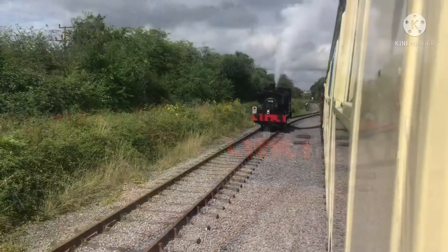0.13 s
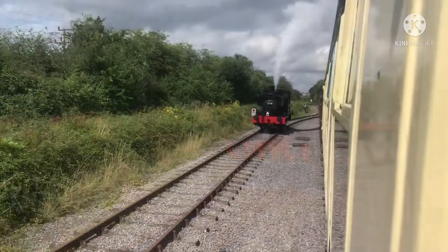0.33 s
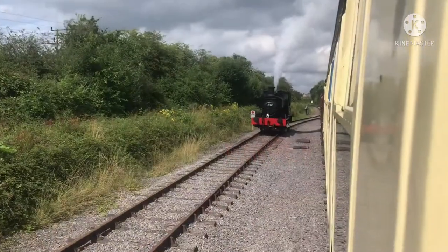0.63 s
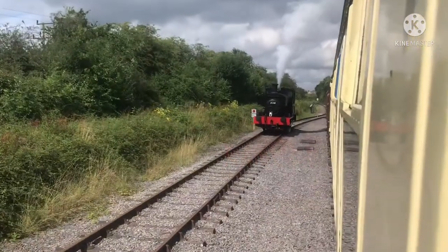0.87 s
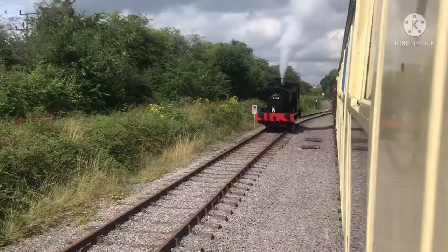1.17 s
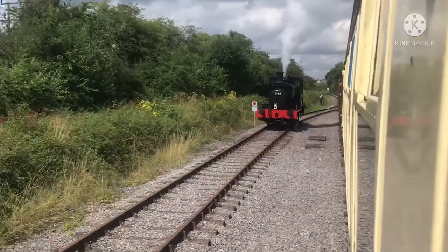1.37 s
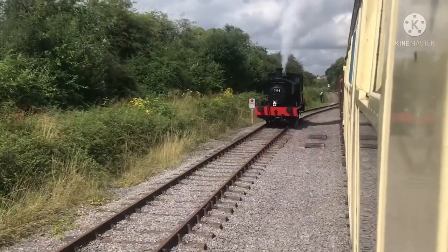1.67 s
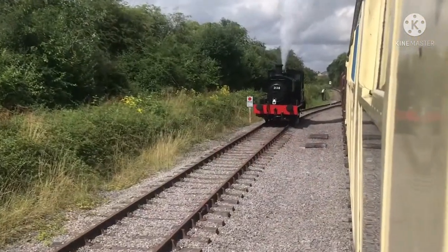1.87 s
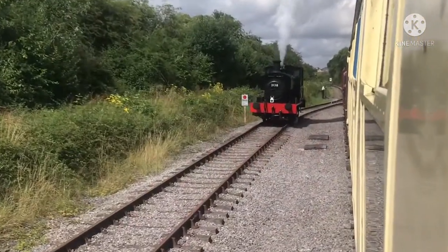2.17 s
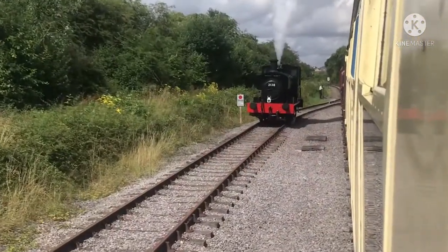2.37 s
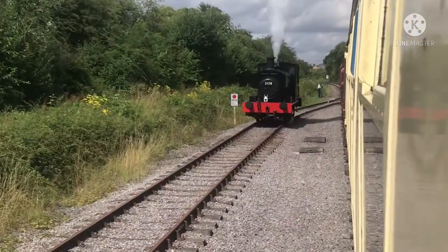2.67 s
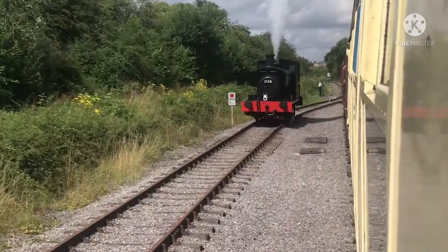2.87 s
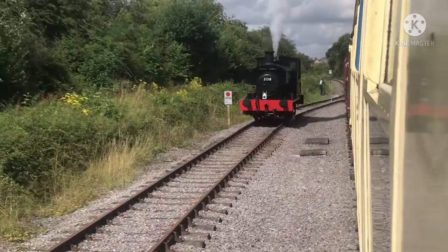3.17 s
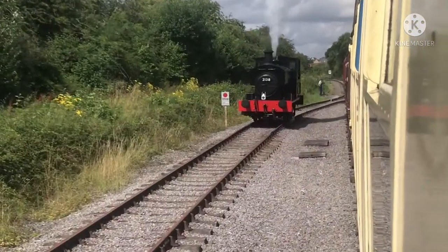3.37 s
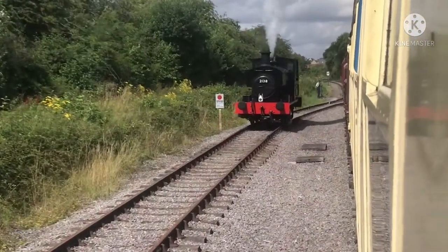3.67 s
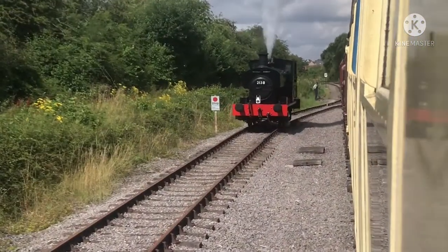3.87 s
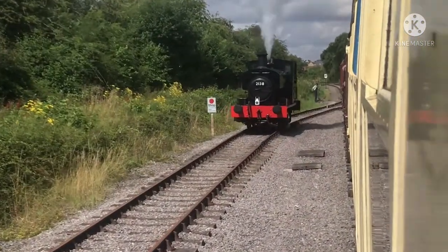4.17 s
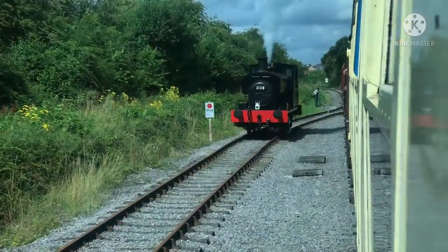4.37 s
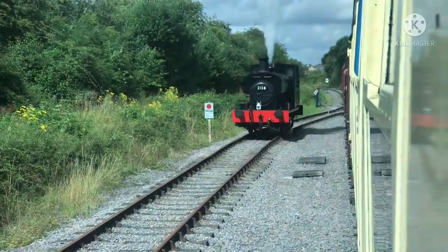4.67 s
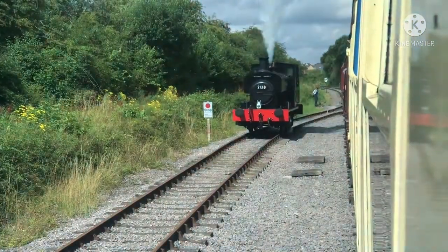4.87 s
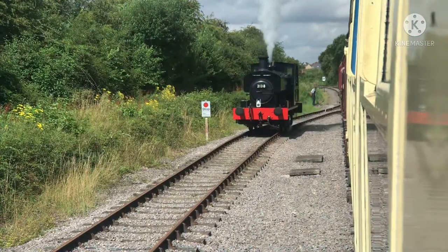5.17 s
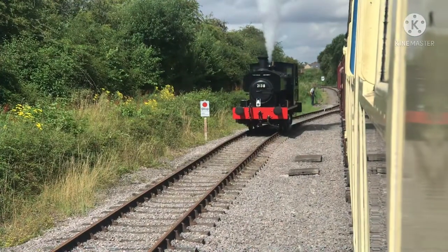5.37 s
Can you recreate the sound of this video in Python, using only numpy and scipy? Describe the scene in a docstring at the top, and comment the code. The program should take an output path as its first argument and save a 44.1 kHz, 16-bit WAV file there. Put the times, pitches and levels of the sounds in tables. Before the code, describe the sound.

Steam blows off from a small locomotive throughout, heard outdoors from a slowly rolling carriage window. The sound is already running at 0 s: a bright, sizzling high hiss with a broad airy body and a quieter dull roar that fills in over the first second. Fine, rapid sputter roughens it. Short surges swell quickly and fade more slowly, at about 1.7 s, a longer one from 2.6 to 3.4 s, and the strongest just after 3.9 s. Then the sizzle falls away, thinnest near 4.8 s, recovering slightly by the end at 5.5 s. Far beneath are a very faint deep carriage rumble and a wheel murmur that grows slightly. Soft dull knocks come around 0.9 to 1.1 s, a thud at 4.0 s and a short hollow panel tap at 4.7 s, mostly masked. The pickup is close to mono, with a slight boxy reflection from the carriage side.

```python
"""At a carriage window, rolling slowly towards a small steam locomotive that blows off steam.
The jet is patchy filtered noise: a dull roar, a broad hiss and a bright sizzle that swells in surges.
Reflections off the carriage side colour it. Underneath, low noise rumbles and murmurs for the carriage,
and soft knocks are noise thuds with ringing panel tones.
One microphone feeds both channels, the left a little late."""
import sys
import numpy as np
from scipy import signal
from scipy.fft import rfft, irfft, next_fast_len
from scipy.io import wavfile
from scipy.ndimage import uniform_filter1d, map_coordinates

SR = 44100
rng = np.random.default_rng(int(sys.argv[2]) if len(sys.argv) > 2 else 0)


def master_out(mix):
    """Clip the mix to full scale and print it as 16-bit PCM to the path in sys.argv[1]."""
    frames = np.transpose(np.atleast_2d(mix))
    ceiling = np.clip(frames, -1, 1)
    pcm = np.round(ceiling * 32767).astype(np.int16)
    wavfile.write(sys.argv[1], SR, pcm)


N = 242991  # length in samples, about 5.5 s


def amp(db):
    """Turn decibels into an amplitude gain."""
    return 10 ** (np.asarray(db) / 20)


def unit(x):
    """Scale to rms 1."""
    return x / np.sqrt(np.mean(x ** 2) + 1e-20)


def along(points, hz):
    """Read (frequency_hz, value) points, interpolated on a log frequency axis."""
    point_hz, values = np.transpose(points)
    return np.interp(np.log(hz + 1), np.log(point_hz + 1), values)


def curves(rows):
    """Interpolate each column after the time column to one value per sample."""
    time_s, *columns = np.transpose(rows)
    t = np.arange(N) / SR
    return [np.interp(t, time_s, column) for column in columns]


def wobble(rate):
    """Draw a smooth random curve with `rate` random knots a second."""
    knots = rng.standard_normal(N // 50)
    return map_coordinates(knots, [np.arange(N) * rate / SR], mode="wrap")


def filtered(x, response):
    """Pass x through a fixed filter, response(hz), with padding for its tail."""
    size = next_fast_len(N + SR // 2)
    spectrum = rfft(x, size) * response(np.fft.rfftfreq(size, 1 / SR))
    return irfft(spectrum, size)[..., :N]


def noise(spectrum):
    """Shape white noise to a (frequency_hz, level_db) spectrum, at rms 1."""
    return unit(filtered(rng.standard_normal(N), lambda hz: amp(along(spectrum, hz))))


def swept(x, gain):
    """Pass x through a moving filter, gain(hz, sample index), by short-time spectra."""
    hz, frame_s, frames = signal.stft(x, SR, nperseg=512)
    at = np.minimum((frame_s * SR).astype(int), N - 1)
    return signal.istft(frames * gain(hz[:, None], at), SR, nperseg=512)[1][:N]


def turbulent(spectrum, patchy_db):
    """Make noise of rms 1 in which eddies lift and drop patches of the spectrum."""
    def patches(hz, at):
        field = rng.standard_normal((len(hz), len(at)))
        field = uniform_filter1d(field, size=7, axis=0)  # spread over frequency bins
        field = uniform_filter1d(field, size=12, axis=1)  # spread over time frames
        return amp(patchy_db * unit(field))
    return unit(swept(noise(spectrum), patches))


def rolling():
    """The carriage body rumbles on its springs while the wheels murmur unevenly on the rails."""
    # relative noise spectrum of the carriage body: frequency_hz, level_db
    body_spectrum = [(8, 5), (18, 0.5), (34, -2), (50, -10.5), (80, -24), (140, -44), (400, -72)]
    # relative noise spectrum of wheels on rails: frequency_hz, level_db
    wheel_spectrum = [(30, -6), (80, 0.5), (140, -1.5), (215, 7.5), (280, -11), (420, -5), (700, -2.5),
                      (2000, -5.5)]
    body_start_db, body_db_per_s, sway_db = -49.5, -0.35, 0.5
    wheel_start_db, wheel_db_per_s, uneven_db = -55, 1.32, 1.9  # the wheels grow as the carriage rolls on
    t = np.arange(N) / SR
    body_db = body_start_db + body_db_per_s * t + sway_db * wobble(rate=4.05)
    body = amp(body_db) * noise(body_spectrum)
    wheel_db = wheel_start_db + wheel_db_per_s * t + uneven_db * wobble(rate=9.7)
    wheels = amp(wheel_db) * turbulent(wheel_spectrum, patchy_db=0.5)
    return body + wheels


def knocks(attack_s=0.0039):
    """Each jolt gives a dull, decaying noise thud and briefly rings the modes of a body panel."""
    # knocks of the carriage: start_s, thud_db, panel_ring_db, thud_t60_s (time to fall 60 dB)
    jolts = [(.905, -48, -63, 0.3), (.945, -46, -62, 0.16), (1.115, -55, -47, .06), (4.038, -34, -46, .05),
             (4.704, -37, -35.5, .04)]
    # relative noise spectrum of a thud: frequency_hz, level_db
    thud_spectrum = [(30, -2), (110, 2), (180, 1), (330, -3), (600, -11), (1200, -19), (4000, -50)]
    # ringing modes of the body panel: pitch_hz, relative_level_db, t60_s
    panel_modes = [(496, -1, 0.12), (635, 4.5, 0.06)]
    out = np.zeros(N)
    for start_s, thud_db, ring_db, thud_t60_s in jolts:
        t = np.maximum(np.arange(N) / SR - start_s, 0)
        thud = amp(thud_db) * noise(thud_spectrum) * amp(-60 * t / thud_t60_s)
        ring = np.zeros(N)
        for pitch_hz, level_db, t60_s in panel_modes:
            ring += amp(level_db - 60 * t / t60_s) * np.sin(2 * np.pi * pitch_hz * t)
        onset = 1 - np.exp(-t / attack_s)  # zero until the knock starts
        out += (thud + amp(ring_db) * ring) * onset
    return out


def surging():
    """Steam surges through the valve: each lift in dB swells quickly, holds and dies away more slowly."""
    # surges of steam through the valve: start_s, hold_s, lift_db
    surges = [(0.024, 0.22, 2), (1.156, 0.075, 1.3), (1.643, 0.044, 5), (2.617, 0.38, 3.5),
              (3.086, 0.14, 3.5), (3.855, 0.062, 9)]
    attack_s, release_s = 0.11, 0.18
    t = np.arange(N) / SR
    lift_db = np.zeros(N)
    for start_s, hold_s, surge_db in surges:
        swell = np.sin(np.pi / 2 * np.clip((t - start_s) / attack_s, 0, 1)) ** 2
        since_hold_s = np.maximum(t - start_s - attack_s - hold_s, 0)
        lift_db += surge_db * swell * np.exp(-since_hold_s / release_s)
    return lift_db


def plume():
    """The wide part of the jet: turbulence makes a dull roar under a broad hiss, fluttering together."""
    # level of the jet's body before flutter and surges: time_s, roar_db, hiss_db
    jet_levels = [(.15, -41, -25.5), (.7, -34, -20), (1.2, -33, -18.5), (2.6, -34.5, -21),
                  (4.2, -33, -20.5), (5.51, -36.5, -24)]
    # relative noise spectrum of the roar: frequency_hz, level_db
    roar_spectrum = [(200, -78), (450, -10), (700, -11.5), (950, -4), (1400, -1), (2000, 3.5), (2800, 4.5),
                     (4500, -2.5), (9000, -48)]
    # relative noise spectrum of the hiss: frequency_hz, level_db
    hiss_spectrum = [(900, -63), (2000, -16), (2800, -4.5), (3700, -5), (4700, -1), (6000, -2.5),
                     (7300, 0.5), (9500, -4), (12500, -29), (13500, -24), (16000, -33)]
    surge_share = 0.06  # share of a surge's dB lift that reaches the broad hiss
    roar_db, hiss_db = curves(jet_levels)
    flutter_db = 0.096 * wobble(rate=22) + 0.49 * wobble(rate=67)
    roar = amp(roar_db) * turbulent(roar_spectrum, patchy_db=1.68)
    hiss = amp(hiss_db + surge_share * surging()) * turbulent(hiss_spectrum, patchy_db=1.3)
    return (roar + hiss) * amp(flutter_db)


def valve():
    """Wet steam sputters at the valve lip; a grazing reflection combs the sizzle into slowly rising bands."""
    # steady sizzle at the valve lip, before surges and sputter: time_s, level_db
    steady_levels = [(0, -19), (2.5, -16.5), (4.5, -20), (4.82, -25), (5.51, -22.5)]
    # delay of the grazing reflection, its path shrinking on the approach: time_s, delay_ms
    graze_delays = [(1.3, .611), (3.9, .55)]
    # relative noise spectrum of the sizzle: frequency_hz, level_db
    sizzle_spectrum = [(3000, -43.5), (6000, -8), (7300, -9), (8200, 1.5), (9000, 0), (9800, -1.5),
                       (10700, -4.5), (11600, -9), (12700, -14), (13400, -30.5), (16000, -30.5)]
    top_start_hz, top_full_hz = 9300, 11800  # the treble lift fades in between these
    top_rest_db, top_per_surge_db = 0.5, -0.01  # treble lift at rest, and its change per dB of surge
    graze_scale, half_depth_db, focus_per_db = 0.3, -15, 0.07
    steady_db, = curves(steady_levels)
    delay_ms, = curves(graze_delays)
    lift_db = surging()
    sizzle_db = steady_db + lift_db
    bright_db = top_rest_db + top_per_surge_db * lift_db
    # a hard surge is a compact source, so its reflection combs more deeply
    focus = 0.5 + focus_per_db * (sizzle_db - half_depth_db)
    depth = np.clip(graze_scale * focus, 0, 1)

    def colour(hz, at):
        top = np.clip((hz - top_start_hz) / (top_full_hz - top_start_hz), 0, 1)
        delay_s = delay_ms[at] / 1000
        comb = np.abs(1 + depth[at] * np.exp(-2j * np.pi * hz * delay_s))
        return comb * amp(bright_db[at] * top)

    sputter_db = 0.16 * wobble(rate=80) + 0.49 * wobble(rate=140)
    sizzle = unit(swept(turbulent(sizzle_spectrum, patchy_db=1.73), colour))
    return amp(sizzle_db + sputter_db) * sizzle


def window(x):
    """The carriage side returns a dull echo, and the opening adds its fixed peaks and dips."""
    # peaks and dips of the window opening: centre_hz, width_hz, gain_db
    opening = [(503, 85, 6.0), (611, 110, -4.1), (898, 140, 2.2), (1208, 85, 3.0), (1620, 90, -6.0),
               (1752, 75, 3.2), (2151, 70, -5.1), (2516, 85, -3.1), (4099, 155, 2.5), (4615, 65, -2.8),
               (4890, 95, 3.2), (5299, 95, -2.4), (6099, 200, 2.4), (6407, 200, -3.7), (6747, 135, 3.3),
               (7015, 200, -2.4), (9042, 115, 2.9), (9393, 200, -2.5), (10325, 95, -2.8)]
    echo_s, echo_gain, dull_hz = 0.00306, 0.26, 3900  # the echo is halved at dull_hz

    def response(hz):
        echo = echo_gain * np.exp(-2j * np.pi * hz * echo_s) / (1 + (hz / dull_hz) ** 4)
        opening_db = sum(gain_db / (1 + (2 * (hz - centre_hz) / width_hz) ** 2)
                         for centre_hz, width_hz, gain_db in opening)
        return (1 + echo) * amp(opening_db)
    return filtered(x, response)


def scene():
    """Jet and rolling pass the window colouring, knocks do not; one microphone feeds both channels."""
    sound = window(plume() + valve() + rolling()) + knocks()
    return np.array([sound, sound])


def record(dry):
    """The left channel runs late; peaks clip at full scale, then the band ends steeply."""
    left_lag, top_hz = 59, 15850  # lag in samples
    left = np.pad(dry[0], (left_lag, 0))[:N]
    late = np.array([left, dry[1]])
    return filtered(np.clip(late, -1, 1), lambda hz: hz < top_hz)


dry = scene()
out = record(dry)
master_out(out)
```